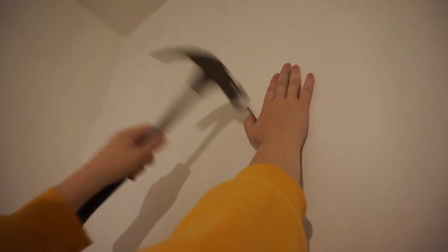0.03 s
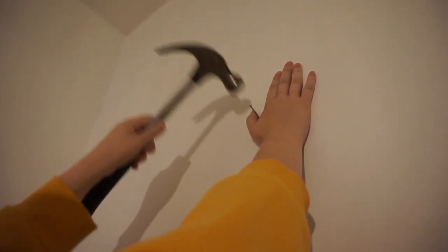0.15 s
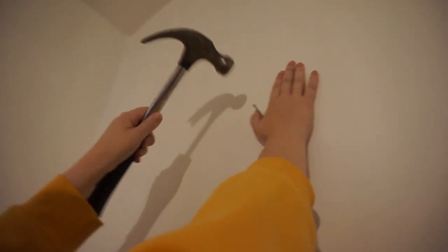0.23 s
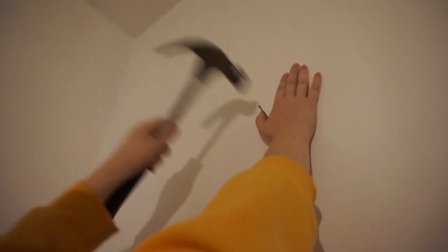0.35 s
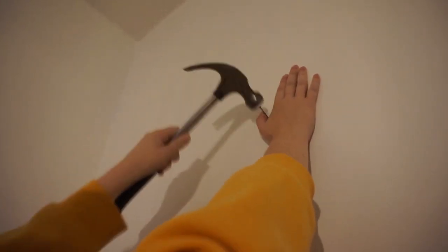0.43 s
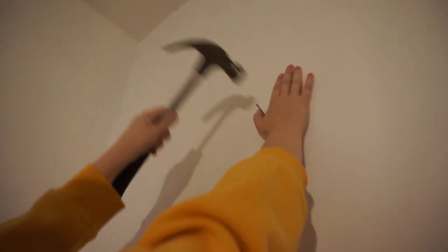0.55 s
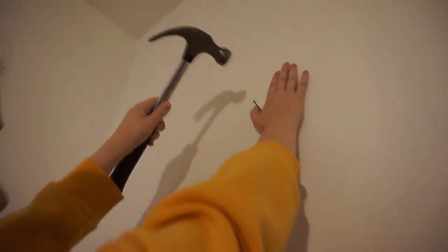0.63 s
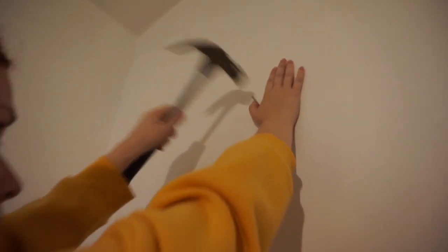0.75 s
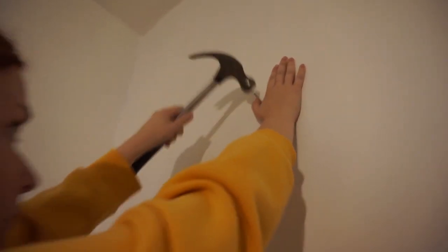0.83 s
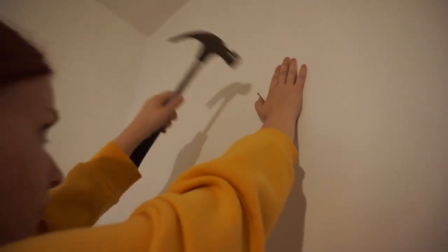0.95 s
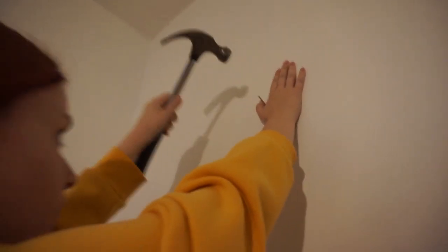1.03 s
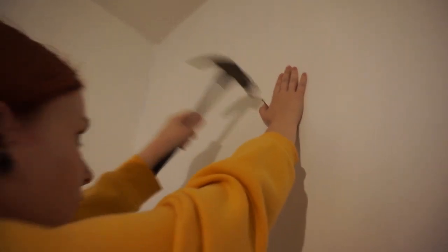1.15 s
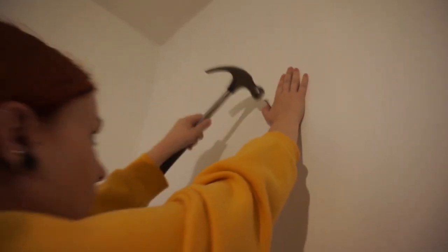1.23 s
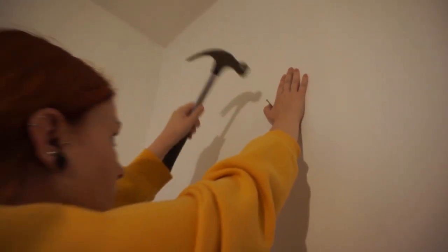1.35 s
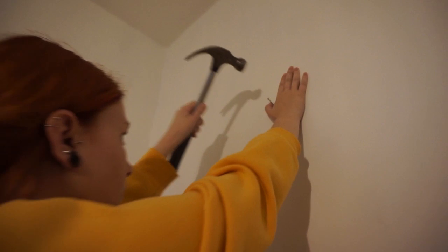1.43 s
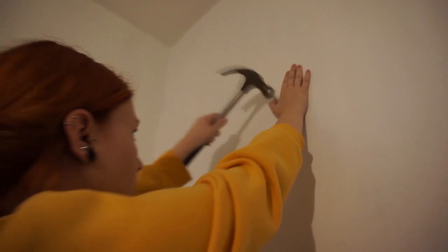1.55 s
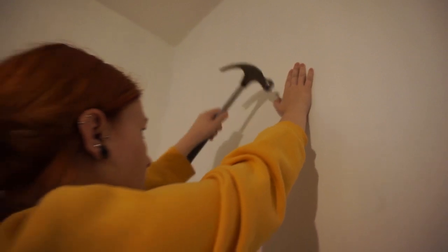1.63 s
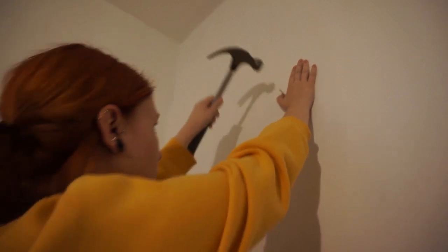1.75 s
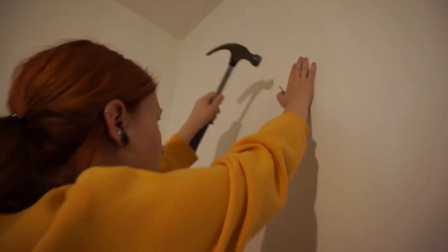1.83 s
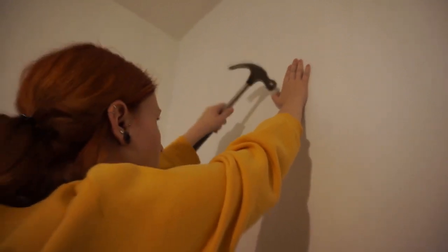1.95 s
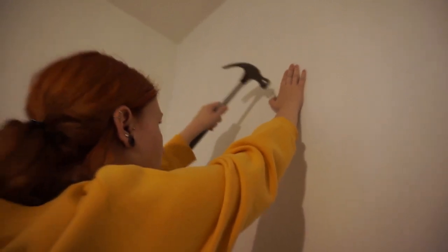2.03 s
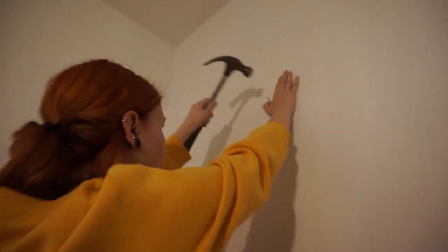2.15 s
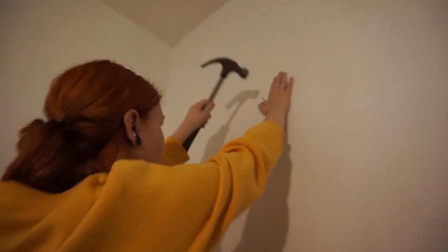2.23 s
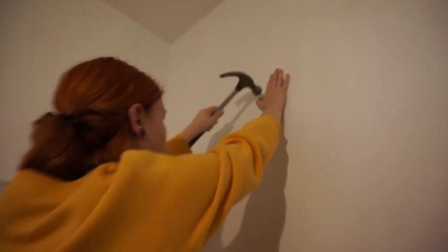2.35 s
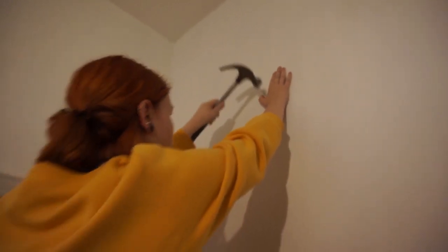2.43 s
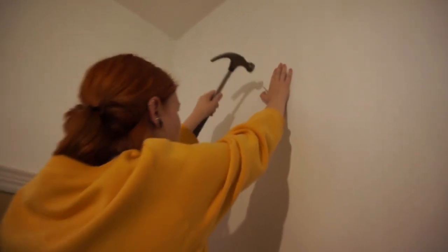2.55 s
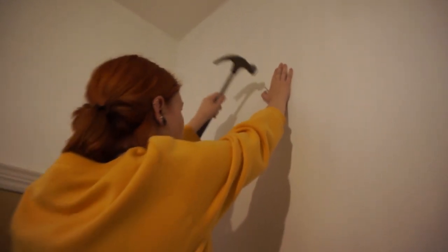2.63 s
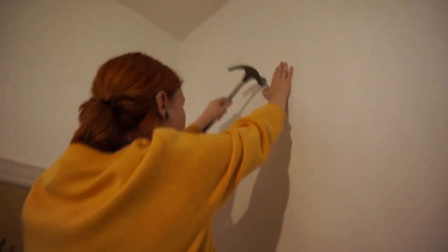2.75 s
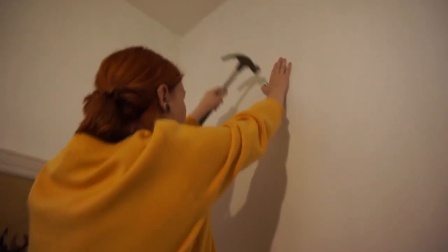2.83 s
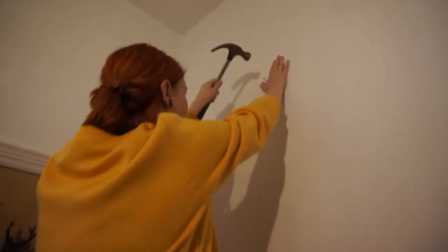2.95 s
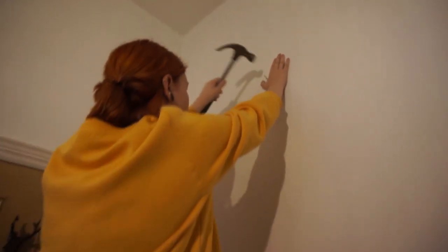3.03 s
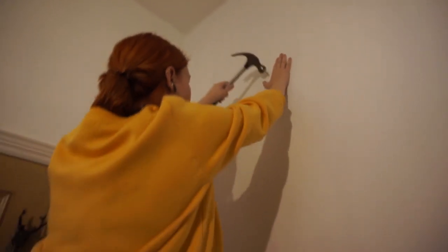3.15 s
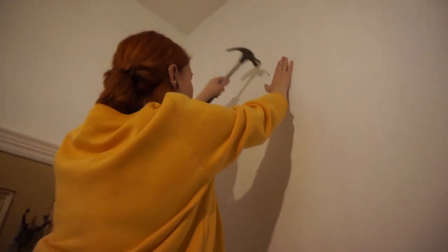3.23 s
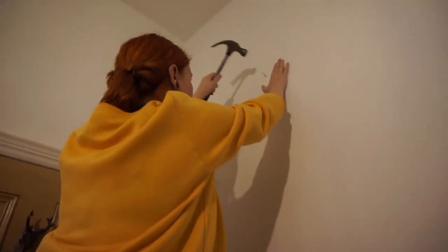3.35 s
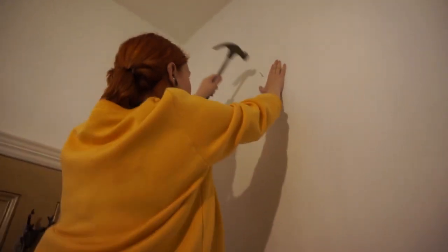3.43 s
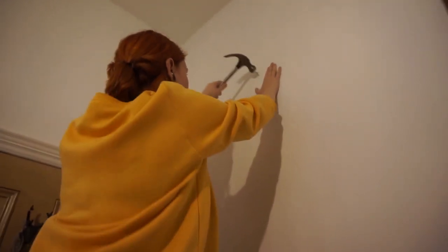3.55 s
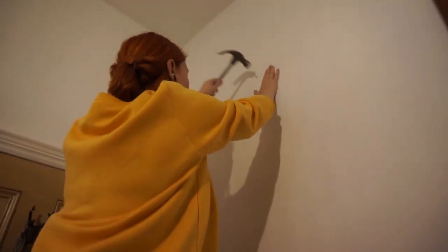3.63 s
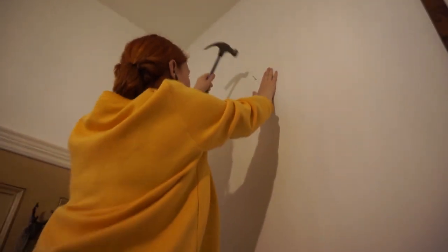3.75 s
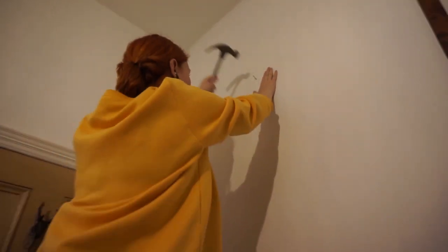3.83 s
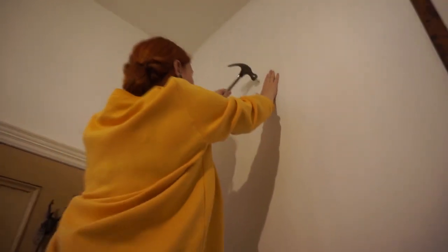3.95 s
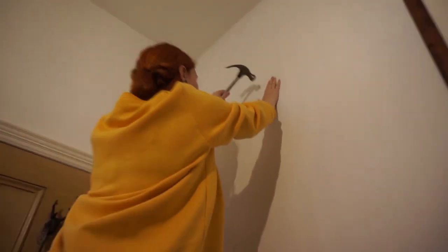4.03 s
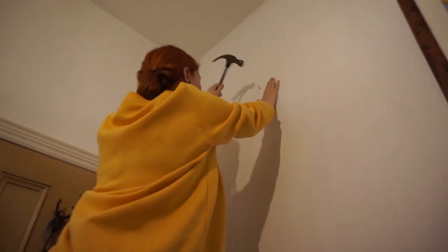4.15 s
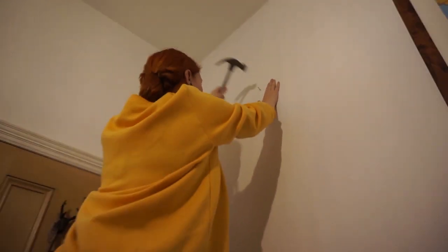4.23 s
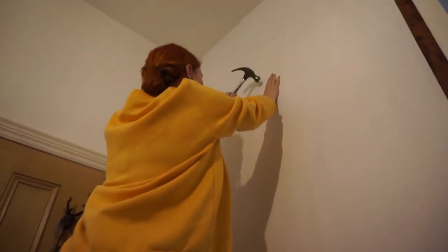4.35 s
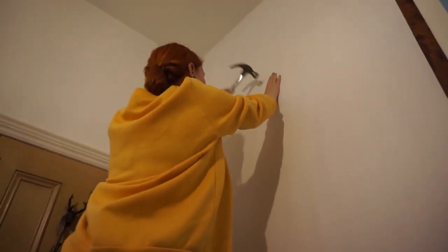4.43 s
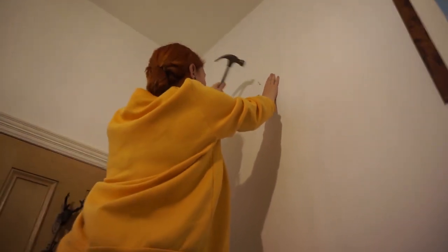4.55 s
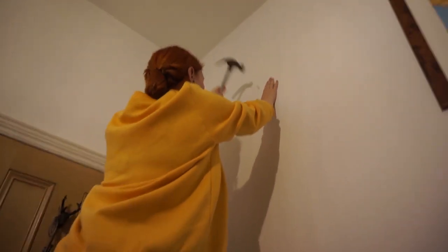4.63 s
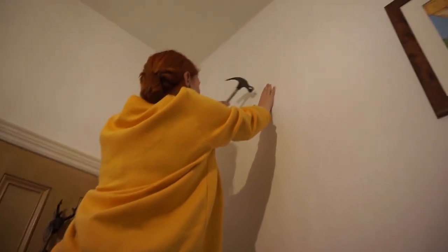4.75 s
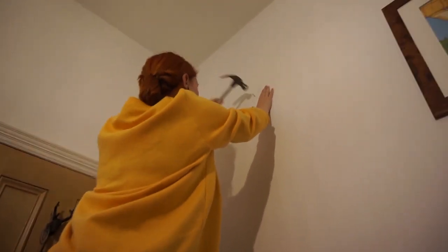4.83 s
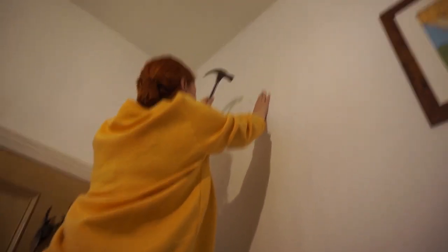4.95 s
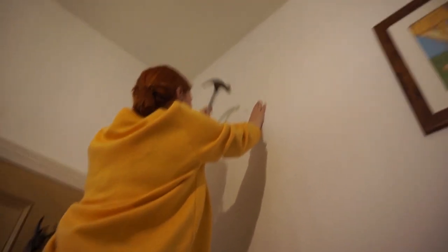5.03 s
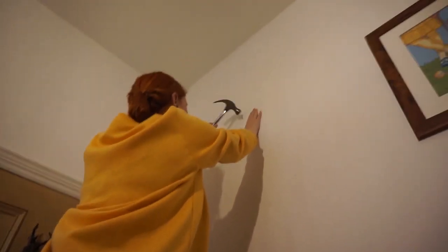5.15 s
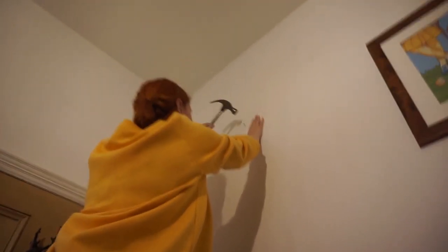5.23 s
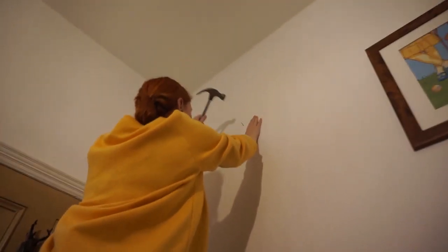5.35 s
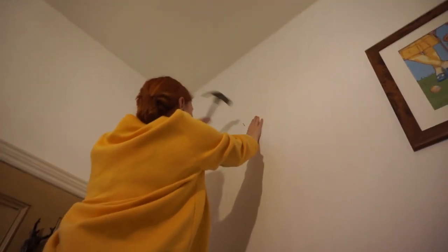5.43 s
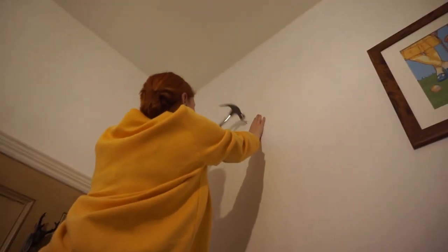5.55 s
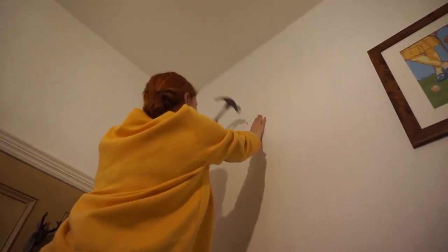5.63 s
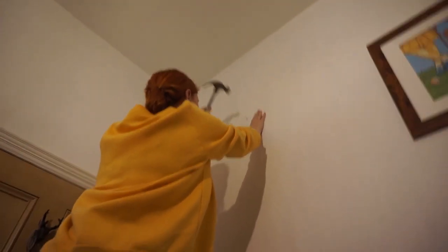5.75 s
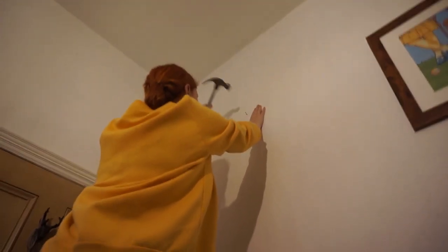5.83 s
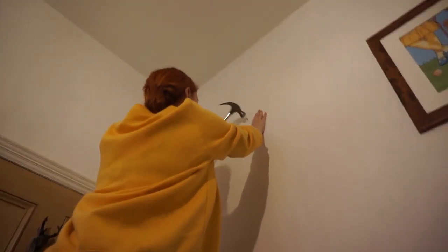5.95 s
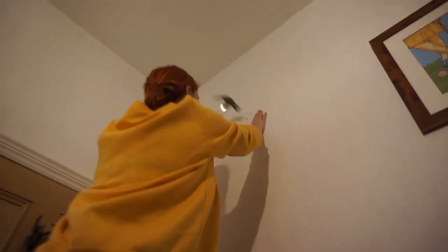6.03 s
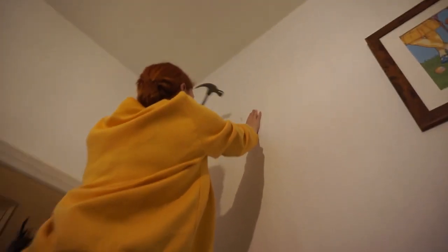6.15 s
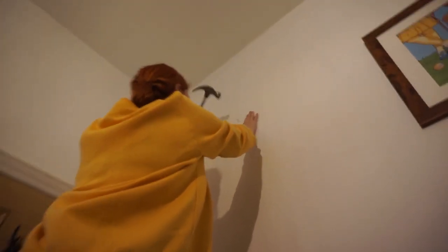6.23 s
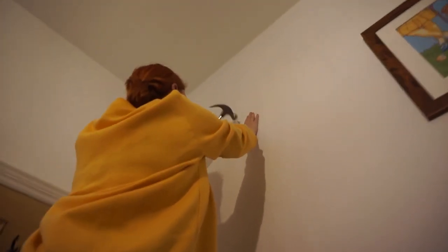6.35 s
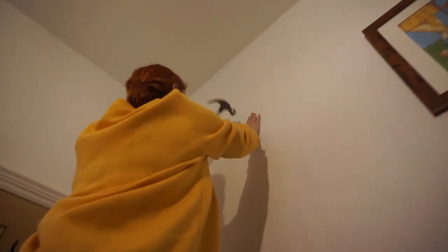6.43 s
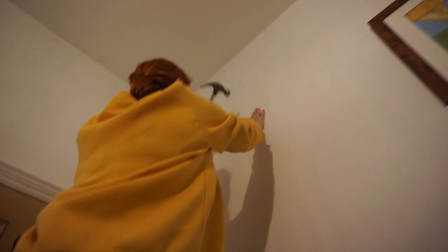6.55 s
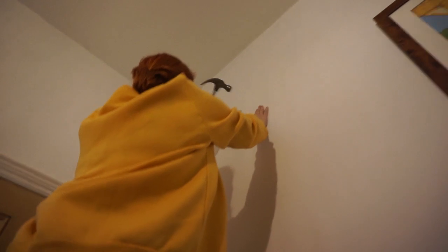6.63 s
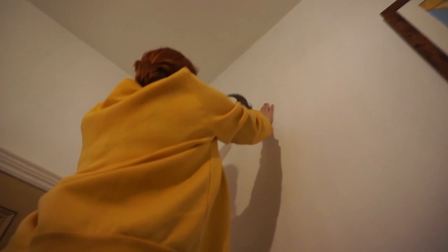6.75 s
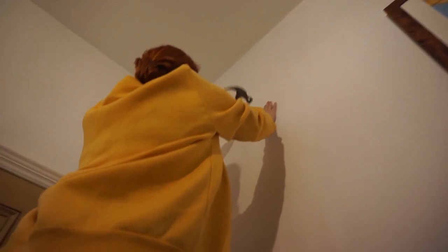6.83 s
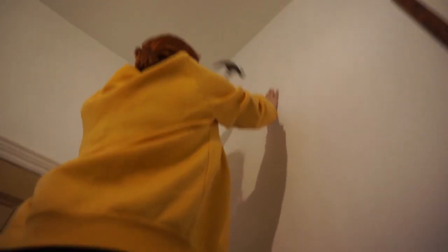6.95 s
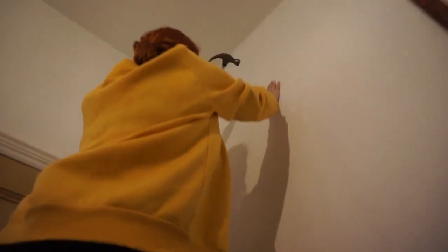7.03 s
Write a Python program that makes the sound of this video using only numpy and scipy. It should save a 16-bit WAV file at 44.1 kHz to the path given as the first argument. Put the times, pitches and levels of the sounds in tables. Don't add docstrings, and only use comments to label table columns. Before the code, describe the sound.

A steel hammer drives a nail into a hollow indoor wall in steady blows, turning from bright ringing ticks to dull woody knocks.

```python
import sys
import numpy as np
from scipy import signal
from scipy.fft import rfft, irfft, next_fast_len
from scipy.io import wavfile

SR = 44100
rng = np.random.default_rng(int(sys.argv[2]) if len(sys.argv) > 2 else 0)


def to_wav(sig):
    pcm = np.clip(np.atleast_2d(sig), -1, 1) * 32767
    pcm = np.round(pcm).astype(np.int16)
    wavfile.write(sys.argv[1], SR, pcm.T)


def decibels_to_gain(level_db):
    exponent = np.asarray(level_db, float) / 20
    return 10 ** exponent


N = 312915

# [t/s, strength/dB, brightness/dB, crack peak/dB, panel knock peak/dB]
BLOWS = [(-0.25, 1.5, 3, -14, -35), (0.113, 1.5, 0, -14.5, -44), (0.465, 1, 0.5, -14, -39.5),
         (0.8529, 0, 0.5, -16.5, -35), (1.2469, 1.5, -1, -16.5, -34.5), (1.6117, -1.5, 2.5, -15.5, -33.5),
         (2.0021, -1, 2, -17, -36), (2.3889, 0, 1, -18, -33.5), (2.7726, 0, -1, -22, -34),
         (3.1721, -1, -0.5, -23, -33.5), (3.571, -1, 0, -19.5, -30), (3.9874, 0.5, 1, -22, -37.5),
         (4.3823, 0, 0, -19.5, -23), (4.7765, 2, -2, -20.5, -24), (5.1869, 1.5, -6, -24.5, -15.5),
         (5.593, 0, 0, -32, -18), (6.0003, 0, 0.5, -32, -17), (6.3983, .5, 1.5, -35, -18),
         (6.8072, 1, 1.5, -45, -19.5)]
PARTS_HZ = [240, 620, 1900, 4200, 8200]
# [share driven/0-1, crack f/Hz, panel knock f/Hz]
PITCHES = [(0, 4100, 350), (.432, 4200, 350), (.438, 4200, 800), (.56, 3800, 850), (.6, 4000, 660),
           (.66, 2700, 700), (.72, 1900, 625)]


def at_hz(points, hz):
    table = np.array(points)
    return np.interp(np.log(hz), np.log(table[:, 0]), table[:, 1])


def add(out, sound, s):
    at = round(s * SR)
    first = max(at, 0)
    last = max(min(at + sound.shape[-1], N), 0)
    out[:, first:last] += sound[..., first - at:max(last, first) - at]


def pan(db):
    gains = decibels_to_gain(np.array([[db / 2], [-db / 2]]))
    return gains / gains.mean()


def stereo(mid, side, hz):
    # [f/Hz, coherence/0-1]
    likeness = [(60, 1), (270, 0.98), (580, 0.83), (1200, 0.42), (2600, 0.16), (5500, 0.08), (11000, 0.22)]
    alike = np.clip(at_hz(likeness, hz), 0, 1)
    return (np.sqrt(1 + alike) * mid + np.sqrt(1 - alike) * side * [[1], [-1]]) / np.sqrt(2)


def bump(hz, centre_hz, width_hz):
    return 1 / (1 + (2 * (hz - centre_hz) / width_hz) ** 2)


def burst(hz, t60, rise_s):
    t = np.arange(round(1.5 * t60 * SR)) / SR
    decay = decibels_to_gain(-60 * t / t60)
    swell = 1 - np.exp(-(t / rise_s) ** 2)
    wave = np.sin(2 * np.pi * hz * t) * decay * swell
    return wave / np.abs(wave).max()


def dying_noise(hz, width_hz, t60):
    t = np.arange(round(t60 * SR)) / SR
    edges_hz = [hz - width_hz / 2, hz + width_hz / 2]
    band = signal.butter(2, edges_hz, "band", fs=SR, output="sos")
    settle = 2000
    noise = stereo(*rng.standard_normal((2, len(t) + settle)), np.array([hz]))
    noise = signal.sosfilt(band, noise)[:, settle:]
    return noise / noise.std() * decibels_to_gain(-60 * t / t60) * (1 - np.exp(-t / 0.00023))


def depth(s):
    # [t/s, share/0-1]
    driven = [
        (0, 0),
        (1.25, 0.02),
        (1.6, 0.4),
        (2.0, 0.43),
        (2.8, .45),
        (4.4, 0.6),
        (5.2, 0.72),
        (5.6, 1),
        (7.1, 1),
    ]
    return np.interp(s, *np.transpose(driven))


def by_depth(share, stages_db):
    return np.interp(share, [0, .5, 1], stages_db)


def at_depth(table, s):
    shares, *columns = np.transpose(table)
    return np.array([np.interp(depth(s), shares, column) for column in columns])


def feeds():
    # [share driven/0-1, wall boom/dB, panel/dB, nail/dB, hammer face/dB, sizzle/dB]
    powers = [
        (0, -52, -51.5, -46.5, -42, -59.5),
        (.43, -47.5, -39, -47, -37, -54.5),
        (.62, -44.5, -34.5, -41, -41, -46),
        (1, -48.5, -30, -33.5, -52, -63.5),
    ]
    bright_shares = np.array([0.24, -.6, 0.44, 1, 0.93])
    glance_db = np.array([-73, -51.5, -45.5, -42.5, -49.5])
    fed = []
    for s, db, bright_db, _, _ in BLOWS:
        fed.append((s - .0007, at_depth(powers, s) + db + bright_db * bright_shares))
    return fed + [(4.081, glance_db)]


def flexes():
    return [(s - .0011, db, at_depth(PITCHES, s)[1]) for s, _, _, _, db in BLOWS[1:]]


def arrivals():
    # [delay/s, level/dB, pitch share, left-right level/dB]
    paths = [
        (0, 0, 1, -4.5),
        (.00345, -.5, 1.02, -2),
        (.00525, -3, .87, 9.5),
    ]
    # [delay/(s/s), level/(dB/s), pitch share/(1/s), left-right/(dB/s)]
    paths_per_s = [
        (0, 0, 0, 0),
        (-.00023, 0, -.07, 0),
        (-.00023, .5, -.045, -1.3),
    ]
    # [t/s, peak level/dB, f/Hz, left-right level/dB]
    glance_cracks = [
        (4.0814, -11, 2900, 2),
        (4.0907, -16, 2900, -3),
        (4.093, -19, 2600, 4),
    ]
    heard = []
    for s, _, _, db, _ in BLOWS:
        for delay_s, path_db, share, pan_db in np.array(paths) + s * np.array(paths_per_s):
            hz = max(share * at_depth(PITCHES, s)[0], 1800)
            heard.append((s + delay_s, db + path_db, hz, pan_db))
    return heard + glance_cracks


def room_tone():
    # [f/Hz, density level/dB per Hz]
    air_db = [(35, -61.5), (60, -16), (222, -12), (446, 0.5), (567, -8.5), (877, 0), (1140, -4), (2190, 1),
              (3700, -8.5), (11000, -22), (14300, -60), (22000, -120)]
    size = next_fast_len(N)
    hz = np.fft.rfftfreq(size, 1 / SR) + 1e-3
    spectrum = stereo(*rfft(rng.standard_normal((2, size))), hz) * decibels_to_gain(at_hz(air_db, hz))
    air = irfft(spectrum, size)[:, :N]
    return decibels_to_gain(-72) * air / air.std()


def rustle():
    # [t/s, hold/s, rms level/dB]
    rubs = [
        (0.0, .5, -80.5),
        (1.66, .4, -82),
        (3.2, .8, -63.5),
        (4.39, 0.96, -66),
    ]
    rise_db_per_s, fall_db_per_s, rest_db = 31.5, 82.5, -89
    bright = signal.butter(1, 3500, "high", fs=SR, output="sos")
    noise = signal.sosfilt(bright, rng.standard_normal((2, N)))
    t = np.arange(N) / SR
    level_db = np.full(N, float(rest_db))
    for s, hold_s, db in rubs:
        rise_db = rise_db_per_s * np.maximum(s - t, 0)
        fall_db = fall_db_per_s * np.maximum(t - s - hold_s, 0)
        level_db = np.maximum(level_db, db - rise_db - fall_db)
    return decibels_to_gain(level_db - 7) * noise


def colour_db(hz, parts_db, share, landing):
    parts_wide_hz = [280, 700, 1900, 3000, 5000]
    # [f/Hz, width/Hz, standing/dB, half in/dB, driven/dB]
    rings = [(115.2, 10, -3.5, 15, 8.5), (182, 6.6, 10.5, 3.5, -10), (229, 7.5, 6, 14, 8),
             (286.2, 54, 10, 9.5, 8), (376, 29, 11, 3.5, 10), (450, 15, 10, 9.5, 7.5),
             (498, 30, 9.5, 1.5, 8.5), (567, 74, -1.5, -15, 3), (663, 19, -14.5, 3, 4.5),
             (754, 28, -1.5, 1.5, -1), (893, 170, 8, 6, 2), (1100, 55, 1, 0.5, 1), (1260, 260, 8, 5.5, -1),
             (1570, 420, -4, 0, -7), (1970, 35, -2, 6, -16.5), (2216, 190, -0.5, 4, -3),
             (2547, 250, -2, 4.5, -2), (3130, 140, 5.5, 2, -9), (3620, 130, 1, 1, 1),
             (5580, 900, 4.5, -4.5, -3.5), (6860, 1700, 9, 0, -5.5)]
    per_hz = np.array(parts_db) - 10 * np.log10(parts_wide_hz)
    db = at_hz(list(zip(PARTS_HZ, per_hz)), hz)
    db -= 20 * np.maximum(np.log2(150 / hz), 0)
    for ring_hz, width_hz, *stages_db in rings:
        db += by_depth(share, stages_db) * bump(hz, ring_hz, width_hz)
    panel_hz, nail_hz, nail_db, damped_hz = landing
    db += 2.5 * bump(hz, panel_hz, width_hz=120)
    db += nail_db * bump(hz, nail_hz, width_hz=235)
    return db - 9 * bump(hz, damped_hz, width_hz=254)


def room_tails():
    # [f/Hz, t60/s near the wall, t60/s across the room]
    room_t60 = [(60, 0.66, 0.29), (198, 0.32, 0.51), (570, 0.41, 0.45), (1500, 0.5, 0.69),
                (3930, 0.45, 0.41), (7100, 0.42, 0.64), (10800, 0.35, 0.33)]
    # [from t/s, panel f/Hz, nail f/Hz, nail level/dB, damped f/Hz]
    landings = [(-0.5, 450, 1940, 30, 1680), (0, 420, 2280, 6, 1260), (1.45, 450, 2060, 7, 1100),
                (1.85, 410, 1360, 0.5, 1100), (3, 900, 1400, 0.5, 1110), (3.8, 874, 2480, 2, 1040),
                (4.25, 377, 1240, 3.5, 1030), (4.6, 480, 1060, 2.5, 1260), (5, 506, 1410, 6.5, 1046),
                (5.4, 480, 1900, -4.5, 1254), (6.2, 502, 1180, 1, 1435)]
    kept = .3
    out, size = np.zeros((2, N)), 3 * 2 ** 13
    t = np.arange(size) / SR
    hz = np.fft.rfftfreq(size, 1 / SR) + 1e-3
    centres = np.geomspace(60, 11000, num=8)
    place = np.interp(np.log(hz), np.log(centres), np.arange(8))
    masks = np.maximum(1 - np.abs(place - np.arange(8)[:, None]), 0)
    build_up = 1 - np.exp(-(t / 0.0013) ** 0.5 * np.sqrt(centres[:, None] / 1000))
    decays = np.array(room_t60)
    near = at_hz(decays[:, [0, 1]], centres)[:, None]
    far = at_hz(decays[:, [0, 2]], centres)[:, None]
    pattern = rng.standard_normal((2, size))
    for s, parts_db in feeds():
        landing = [row[1:] for row in landings if row[0] <= s][-1]
        away = s * SR / N
        shapes = build_up * decibels_to_gain(-60 * (t - .05) / (near + away * (far - near)))
        noise = np.sqrt(kept) * pattern + np.sqrt(1 - kept) * rng.standard_normal((2, size))
        gain = decibels_to_gain(colour_db(hz, parts_db, depth(s), landing) - 2.5) * np.sqrt(SR / 2)
        spectrum = stereo(*rfft(noise), hz) * gain
        bands = irfft(spectrum * masks[:, None], size)
        add(out, np.sum(bands * shapes[:, None], axis=0), s)
    return out


def lingering():
    # [f/Hz, width/Hz, t60/s, standing/dB, half in/dB, driven/dB]
    slow_modes = [(122, 10, 0.78, -13.5, -15.5, -8.5), (168, 10, 0.26, -13.5, -12.5, -23.5),
                  (220, 12, .5, -12, -7, -9), (291, 13, 0.85, -5, -17.5, -0.5),
                  (396.3, 23, 0.43, -11.5, -4.5, 6.5), (450, 15, 0.27, -8.5, -18.5, 8),
                  (886, 24, 0.44, -8, -1, -6), (1315, 80, 0.94, -10, 1.5, -15.5),
                  (1897, 120, 0.95, 5.5, -19.5, -1.5), (2230, 230, .9, 10, -16, 4),
                  (2700, 150, .7, -5.5, -6, 1.5), (3680, 160, 0.92, 0.5, -20.5, -1.5)]
    out = np.zeros((2, N))
    for s, parts_db in feeds():
        for hz, width_hz, t60, *stages_db in slow_modes:
            db = at_hz(list(zip(PARTS_HZ, parts_db)), hz) + by_depth(depth(s), stages_db) - 17
            add(out, decibels_to_gain(db) * dying_noise(hz, width_hz, t60), s + .006)
    return out


def tones():
    # [f/Hz, t60/s, then peak level/dB at each depth below]
    modes = [(169.7, 0.38, -54.5, -54, -57, -62), (220.2, 0.68, -56, -51, -49, -54.5),
             (289, 0.43, -50.5, -52.5, -39, -49), (391, 0.39, -55.5, -56.5, -37.5, -42.5),
             (450, 0.55, -53.5, -52, -69.5, -41), (666, 0.33, -65.5, -51, -44, -52),
             (909, 0.47, -52.5, -54.5, -48.5, -48.5), (2270, .5, -52, -66, -70.5, -63)]
    depths = [0, .44, .63, 1]
    out = np.zeros((2, N))
    for s, blow_db, *_ in BLOWS:
        for hz, t60, *stages_db in modes:
            luck, off = rng.standard_normal(2)
            db = blow_db + np.interp(depth(s), depths, stages_db) + 1.7 * luck
            tone = burst(hz * (1 + .004 * off), t60, rise_s=0.0059)
            add(out, decibels_to_gain(db) * tone[None], s)
    return out


def forerunners():
    out = np.zeros((2, N))
    swell = np.linspace(0, 1, round(.006 * SR)) ** 2
    soft = signal.butter(2, [350, 1500], "band", fs=SR, output="sos")
    for s, db, _ in flexes():
        noise = signal.sosfilt(soft, rng.standard_normal(len(swell)))
        add(out, decibels_to_gain(db - 17) * swell * noise[None], s - .0055)
    return out


def knocks():
    out = np.zeros((2, N))
    for s, db, hz in flexes():
        flex = decibels_to_gain(db + .5) * pan(-2.5) * burst(hz, t60=.024, rise_s=.0011)
        add(out, flex, s - .0002)
        add(out, decibels_to_gain(-26.0) * flex, s + 0.00807)
    return out


def cracks():
    out = np.zeros((2, N))
    for s, db, hz, pan_db in arrivals():
        face_luck, shank_luck = rng.standard_normal(2)
        head = -decibels_to_gain(db - 5) * burst(hz, t60=.0045, rise_s=.0002)
        face = decibels_to_gain(db - 9 + 2 * face_luck) * burst(1.5 * hz, t60=0.003, rise_s=.00015)
        shank_db = db - 12 - 2.5 * s + 2 * shank_luck
        shank = decibels_to_gain(shank_db) * burst(2300 - 90 * s, t60=.012, rise_s=.0003)
        for part in (head, face, shank):
            add(out, pan(pan_db) * part, s)
    return out


def hammer_head():
    # [t/s, f/Hz, rms level/dB, t60/s]
    singing = [(0.116, 2290, -45, .6), (0.468, 2250, -45.5, .6), (4.78, 2620, -47, .6),
               (5.19, 2600, -45, .7), (5.6, 2600, -50, .6), (5.6, 3600, -57, .6), (6.004, 2600, -50, .6),
               (6.403, 2500, -50, .6), (6.812, 2550, -48, .6), (3.572, 8800, -57, .3),
               (3.86, 8700, -76, .3), (3.86, 10300, -78, .2), (3.988, 8850, -53, .45),
               (4.383, 8900, -54, .5), (4.383, 10200, -52, .25), (4.777, 7400, -51, .28),
               (5.186, 8900, -50, .35), (5.593, 8900, -65, .3)]
    # [t/s, f/Hz, width/Hz, rms level/dB, t60/s]
    clacks = [
        (4.082, 2400, 700, -29, 0.27),
        (4.09, 3200, 4000, -28, 0.19),
        (4.106, 4100, 3000, -25.5, .03),
        (4.084, 1330, 700, -38.5, 0.089),
    ]
    out = np.zeros((2, N))
    for s, hz, db, t60 in singing:
        add(out, decibels_to_gain(db) * dying_noise(hz, width_hz=220, t60=t60), s)
    for s, hz, width_hz, db, t60 in clacks:
        add(out, decibels_to_gain(db) * dying_noise(hz, width_hz, t60), s)
    return out


def ticks():
    # [t/s, peak level/dB, left-right level/dB]
    touches = [
        (2.002, -34, 6),
        (2.3886, -26, 18.5),
        (2.7727, -27.5, 9),
        (3.572, -24.5, 0.5),
        (4.0816, -16.5, 3),
        (4.107, -23.5, 2),
    ]
    out = np.zeros((2, N))
    for s, db, pan_db in touches:
        add(out, decibels_to_gain(db) * pan(pan_db) * burst(9200, t60=0.00054, rise_s=.00003), s)
    return out


def handling():
    out = np.zeros((2, N))
    add(out, decibels_to_gain(-49.5) * pan(3) * burst(35, t60=.15, rise_s=.01), 4.085)
    return out


def rattles():
    # [t/s, peak level/dB]
    taps = [(4.625, -60), (4.661, -59), (4.7, -59), (4.734, -54), (4.755, -55), (5.047, -48),
            (5.063, -44.5), (5.08, -54), (5.111, -40), (5.133, -40.5), (5.153, -46), (5.329, -48),
            (5.388, -38), (5.416, -53), (5.423, -41), (5.513, -43), (5.536, -41.5)]
    # [f/Hz, level/dB, t60/s]
    tap_modes = [
        (950, -2, .025),
        (1390, 0, .035),
        (2900, -22, .03),
        (3650, -22, .04),
    ]
    out = np.zeros((2, N))
    for s, db in taps:
        for hz, mode_db, t60 in tap_modes:
            luck_db = 2.5 * rng.standard_normal()
            add(out, decibels_to_gain(db + mode_db - 5 + luck_db) * burst(hz, t60, rise_s=.0008)[None], s)
        add(out, decibels_to_gain(db - 13.5) * dying_noise(1332, width_hz=92, t60=0.26), s + 0.00377)
        add(out, decibels_to_gain(db - 32.5) * dying_noise(3530, width_hz=240, t60=0.48), s + 0.0036)
    return out


def scene():
    background = room_tone() + rustle() + handling()
    reverberant = room_tails() + lingering() + tones()
    direct = forerunners() + knocks() + cracks() + hammer_head() + ticks() + rattles()
    return background + reverberant + direct


def band_limit(x):
    return signal.sosfilt(signal.butter(12, 12350, fs=SR, output="sos"), x)


def record(dry):
    bass_cut = signal.butter(2, 85, "high", fs=SR, output="sos")
    top_cut = signal.cheby2(16, 32, 11220, fs=SR, output="sos")
    thin = signal.sosfilt(bass_cut, dry)
    mix = signal.sosfilt(top_cut, thin)
    return band_limit(mix)


dry = scene()
out = record(dry)
to_wav(out)
```